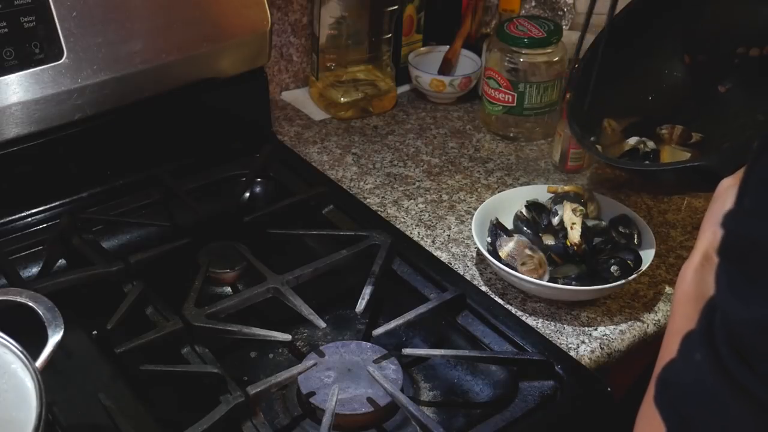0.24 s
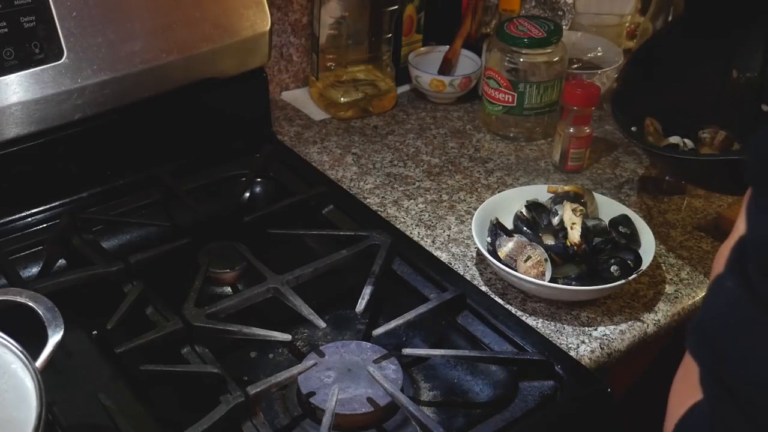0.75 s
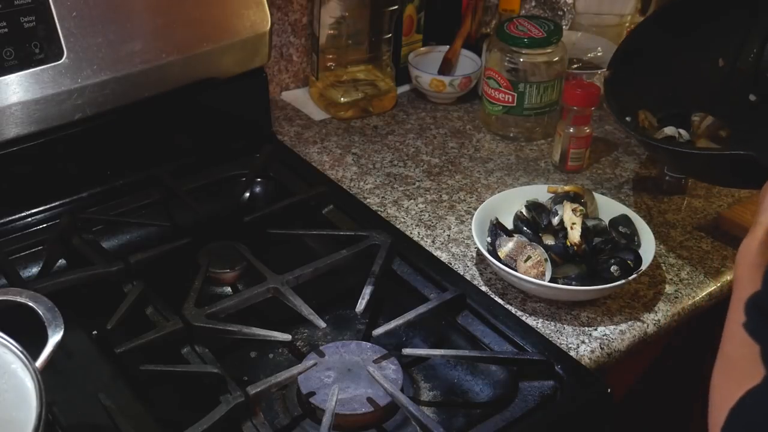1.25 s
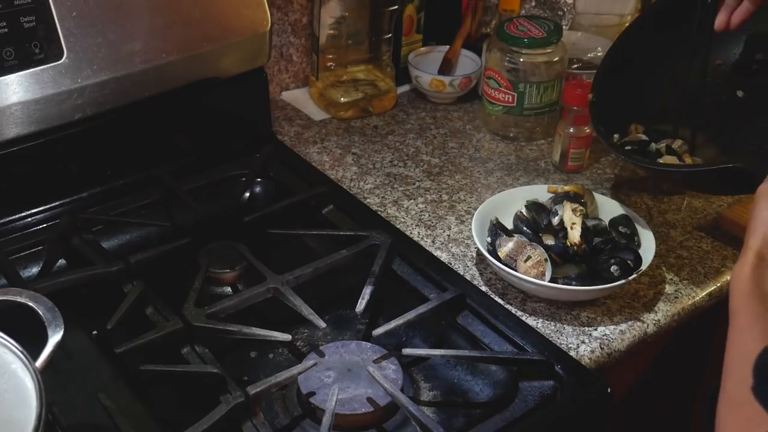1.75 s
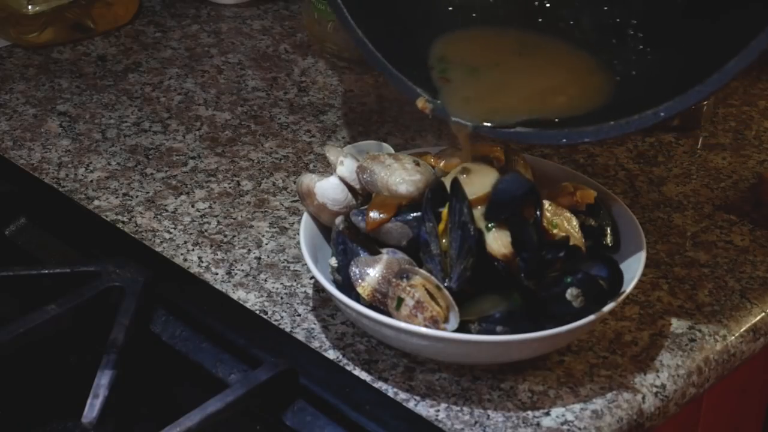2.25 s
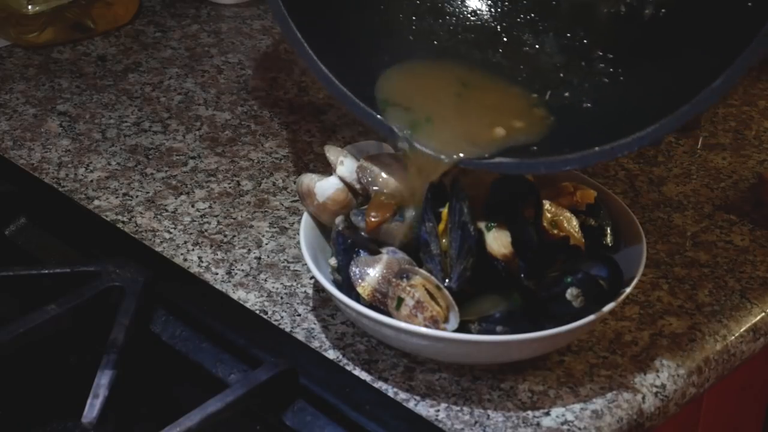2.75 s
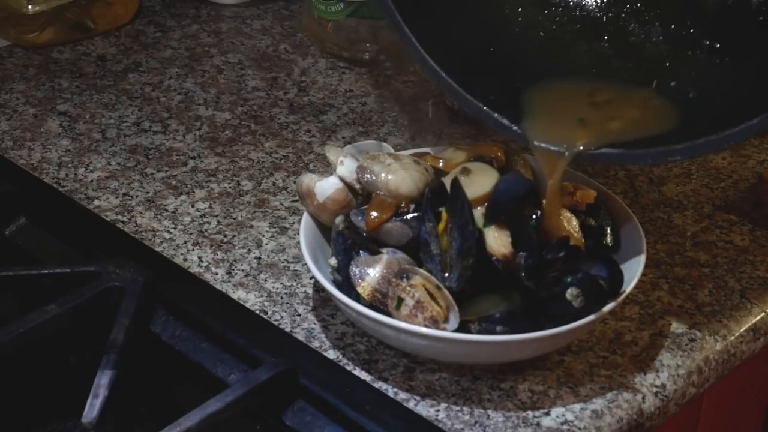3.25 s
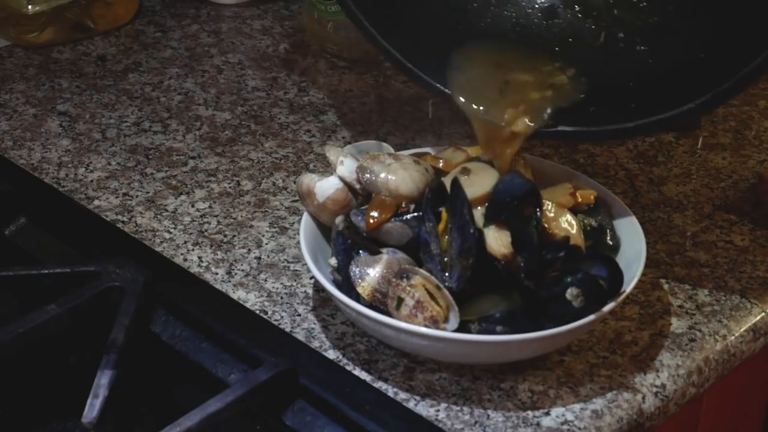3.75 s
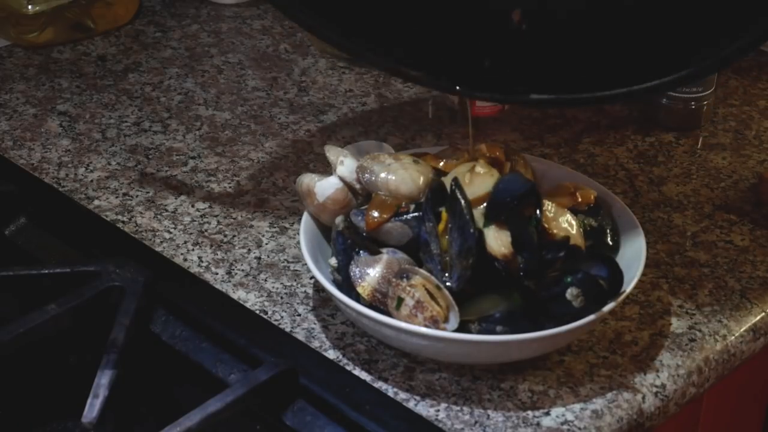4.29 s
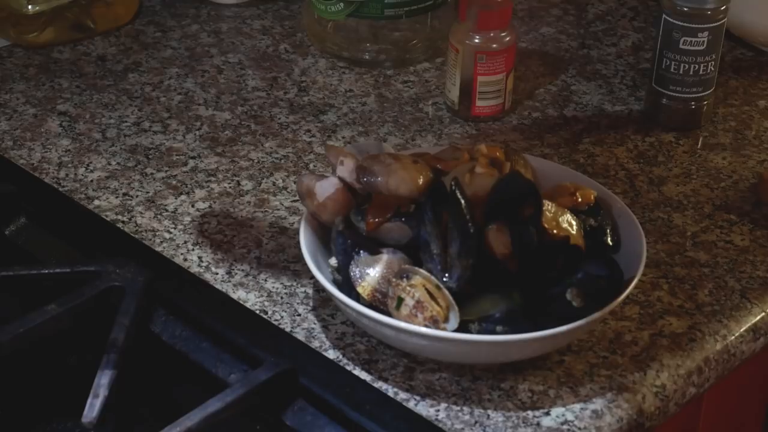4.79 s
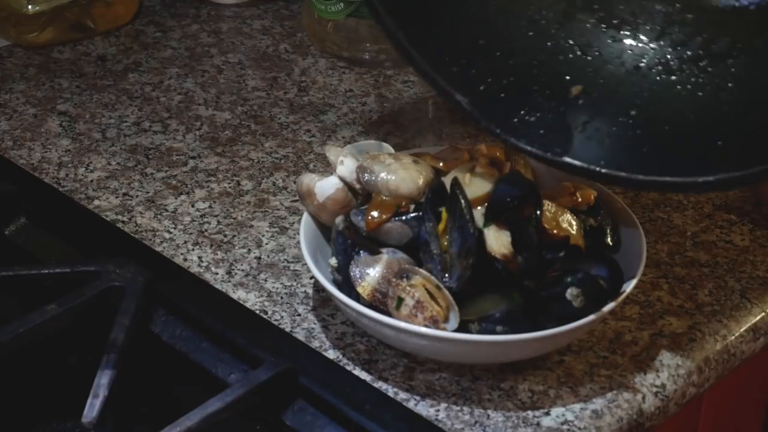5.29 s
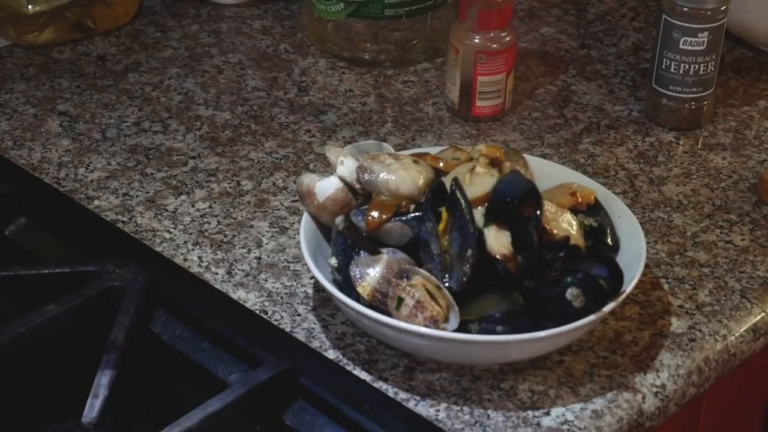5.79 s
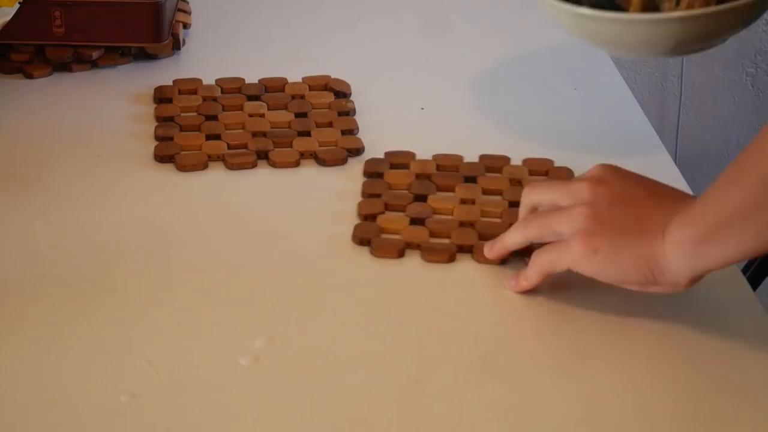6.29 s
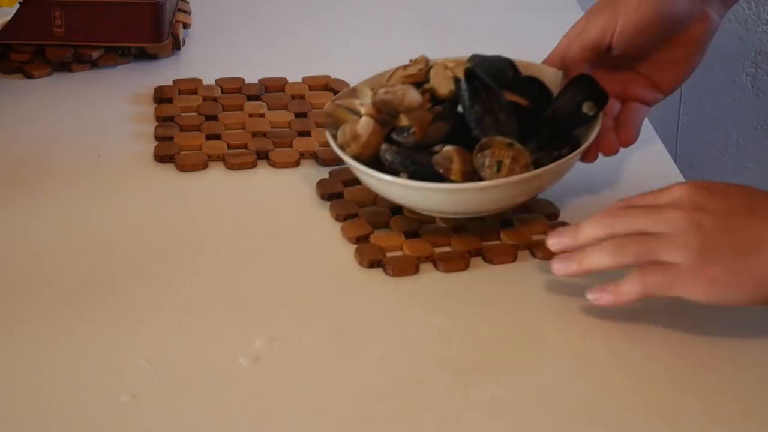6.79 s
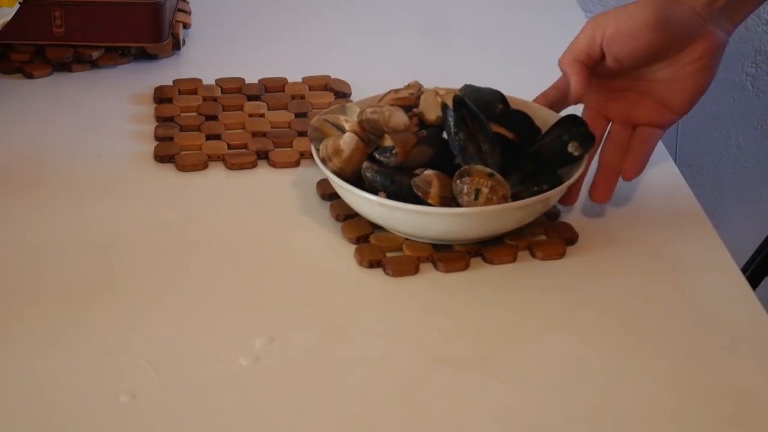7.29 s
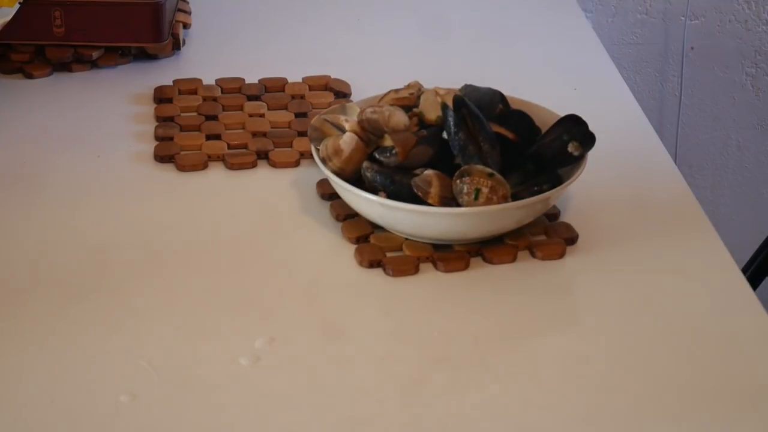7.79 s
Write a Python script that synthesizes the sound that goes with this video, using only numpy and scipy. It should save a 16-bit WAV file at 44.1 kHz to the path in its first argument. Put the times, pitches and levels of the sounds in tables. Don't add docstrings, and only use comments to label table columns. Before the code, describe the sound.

Over a low refrigerator hum, hard shells click and ring china, a wok is tapped and scraped, broth patters, wood rattles, and a full bowl lands.

```python
import sys
import numpy as np
from scipy import signal
from scipy.fft import rfft, irfft, next_fast_len
from scipy.io import wavfile
from scipy.ndimage import uniform_filter1d, map_coordinates

SR = 44100
rng = np.random.default_rng(int(sys.argv[2]) if len(sys.argv) > 2 else 0)


def gain_from_decibels(decibels):
    exponent = np.asarray(decibels, float) / 20
    return 10 ** exponent


def transcribe(u):
    v = np.clip(np.atleast_2d(u).T, -1, 1)
    q = np.round(v * 32767).astype(np.int16)
    wavfile.write(sys.argv[1], SR, q)


N = 354563
TIME = np.arange(N) / SR

# pitch_hz, level_db (per Hz)
AIR = [(100, -32.5), (162, -11), (235, -11), (275, -16), (480, -16.5), (1150, -28.5), (4500, -42),
       (16500, -72)]
DUCT_AIR = [(18, -26.5), (30, -8.5), (55, -5), (85, -5), (125, -7), (170, -43)]
# air_db, hum_120hz_db, hum_60hz_db, hum_240hz_db, fan_46hz_db
STOVE_SIDE = (-51.5, -42, -56.5, -60.5, -78)
TABLE_SIDE = (-50.5, -51, -47.5, -53, -53.5)
# pitch_hz, level_db
MOTOR_WHINE = [(156, -62), (186, -57.5), (360, -63), (515, -66), (1066, -70.5)]
# middle_s, level_db, half_length_s
MOUNT_SWAYS = [
    (5.66, -39.5, 0.073),
    (5.99, -38.5, 0.13),
    (7.2, -52.5, 1),
]
# pitch_hz, level_db (per Hz)
MOUNT_RUMBLE = [(6, -11), (13, -0.5), (20, -9), (36, -10), (48, -40), (100, -79)]
# pitch_hz, t60_s (time to fade by 60 dB)
ROOM_FADE = [(150, 0.43), (1000, 0.55), (4000, 0.41), (7000, 0.31), (10000, 0.27), (15000, 0.053)]
# pitch_hz, level_db (per Hz)
CHANNEL_HISS = [(30, -73), (500, -51), (1000, -52.5), (3000, -54), (7000, -53.5), (12000, -56),
                (15500, -59.5), (16500, -102)]
# middle_s, level_db,
# half_length_s
RUSTLES = [(.005, -39, .018), (.85, -65.5, 0.1), (1.96, -59.5, 0.022), (2.33, -59.5, 0.019),
           (2.66, -59, 0.025), (2.92, -60, 0.064), (3.05, -76, 0.025), (3.39, -60, 0.056),
           (3.7, -58, 0.021), (3.97, -59.5, 0.055), (4.17, -62.5, 0.064), (4.48, -62, 0.032),
           (4.76, -62, 0.032), (5.02, -56.5, 0.023), (5.23, -60.5, 0.03), (5.45, -61, 0.035),
           (5.86, -61, 0.085), (7.5, -59.5, 0.036), (7.59, -49, 0.056), (7.75, -60, 0.074),
           (7.9, -51.5, 0.033)]
# pitch_hz, level_db (per Hz)
CLOTH = [(710, -32), (1200, 1.5), (1560, -17.5), (1640, -14), (1910, -4), (5130, -5), (11700, -21.5),
         (16000, -21)]
# start_s, peak_db, pitch_hz
DROPS = [(2.07, -42, 3400), (2.1357, -43.5, 5550), (2.424, -47.5, 4750), (2.6533, -47, 2260),
         (2.674, -44, 3470), (2.7496, -45.5, 6000), (2.778, -49, 3900), (2.8147, -30.5, 2660),
         (2.8144, -33.5, 3380), (2.83, -40, 2900), (2.892, -44.5, 10300), (2.906, -38, 3200),
         (2.92, -48, 5470), (3.027, -43, 9900), (2.901, -39, 2530), (2.927, -36, 3500),
         (2.975, -38.5, 2280), (3.031, -35, 2620), (3.0984, -42, 2930), (3.156, -34, 4800),
         (3.3203, -48, 3010), (3.5922, -48, 3490), (3.643, -42, 4730), (3.694, -39, 4300),
         (3.697, -45, 10000), (3.7299, -29, 2360), (3.7305, -38, 3700), (3.732, -31.5, 2600),
         (3.733, -39.5, 5800), (3.733, -44, 10000), (3.745, -35.5, 2480), (3.8454, -56, 2800),
         (3.869, -49, 5230), (3.895, -34, 5000), (3.933, -39, 6000), (3.9874, -44, 4180),
         (4.0178, -42, 3170), (4.1116, -44.5, 2040), (4.13, -46, 2000), (4.1634, -45, 1990),
         (4.1789, -41, 4000), (4.267, -41.5, 2260), (4.792, -45.5, 5230), (4.86, -47, 4200)]
# start_s, peak_db, centre_hz
SPATTER = [(2.135, -55, 11000), (2.5703, -42.5, 6000), (2.8135, -34, 4500), (2.88, -40, 11910),
           (2.889, -43, 10000), (2.9044, -42, 11000), (2.9144, -48, 9000), (2.9746, -47, 8900),
           (3.0205, -40, 9330), (3.031, -41, 6100), (3.202, -42, 8500), (3.26, -43, 11000),
           (3.3453, -47, 8000), (3.4047, -45, 11440), (3.557, -46.5, 12400), (3.6932, -36, 6500),
           (3.72, -50, 8000), (3.7304, -34, 3420), (3.8571, -45, 9050), (3.893, -41, 8000),
           (3.933, -44, 7960), (4.049, -42, 11000), (4.0644, -42, 5500), (4.1114, -41, 9000),
           (4.123, -40, 9000), (4.1674, -46, 12000), (4.1912, -36, 4980), (5.849, -36, 9000),
           (5.7894, -52, 4000), (5.8184, -40, 3000)]
# start_s, peak_db, centre_hz, wood_db
TRIVET_KNOCKS = [(5.8481, -33, 1500, -22), (6.2198, -16.5, 3100, -17.5), (6.2259, -5.5, 3140, -12.5),
                 (6.238, -17, 3800, -19), (6.2445, -15, 1990, -21), (6.255, -19.5, 2800, -24),
                 (6.2615, -15.5, 2900, -22), (6.2662, -5.5, 2900, -20.5), (6.274, -18.5, 4350, -22),
                 (6.284, -17.5, 3600, -20), (6.3, -24, 2000, -20), (6.32, -21, 2600, -26),
                 (6.373, -20.5, 2400, -20.5), (6.3752, -15, 1750, -12.5), (6.395, -27.5, 1500, -14.5),
                 (6.6573, -40, 3500, -24), (6.676, -21, 2840, -22), (6.6845, -27, 2750, -13.5),
                 (6.693, -35, 2300, -11), (6.702, -32, 3000, -14)]
# pitch_hz, level_db, t60_s
WOOD_MODES = [(991, 0.5, 0.044), (1295, 0.5, 0.14), (1777, -3.5, 0.049), (1978, 1, 0.066),
              (2786, -4.5, 0.06), (3200, -2.5, 0.035), (3670, -1.5, 0.076), (5510, -1, .03),
              (5970, -10, 0.027)]
# start_s, level_db, pitch_hz, t60_s
BLOCK_NOTES = [(6.226, -14, 4221, .025), (6.2262, -13.5, 5140, 0.027), (6.2275, -15, 1947, .035),
               (6.229, -19.5, 1034, 0.035), (6.243, -18, 2001, 0.034), (6.247, -20, 4330, .03),
               (6.2665, -12.5, 3402, .03), (6.267, -17, 5330, .025), (6.28, -22, 2067, .035),
               (6.288, -25, 4393, .025), (6.321, -26, 3644, .03), (6.321, -26, 1800, .03),
               (6.376, -23, 2842, .025), (6.378, -23, 1007, .035), (6.686, -33, 3590, .03),
               (6.689, -35, 1677, .035), (6.702, -34, 3640, .03), (6.9762, -1.5, 450, .03),
               (6.986, -11.5, 735, 0.027), (6.995, -16.5, 1292, .045)]
# start_s, level_db, hold_s, fade_db_per_s
TRIVET_SLIDES = [
    (6.05, -46.5, 0.19, 100),
    (6.22, -33.5, 0.027, 103),
    (6.29, -31, 0.18, 170),
    (6.67, -35.5, 0.018, 165),
]
# pitch_hz, level_db (per Hz)
SLIDE_GRIT = [(240, -40), (500, -14.5), (994, -6.5), (3300, -8.5), (6000, -19), (9000, -31.5), (13000, -37),
              (16000, -48)]
# start_s, peak_db, centre_hz, table_db
BOWL_KNOCKS = [
    (6.9761, -10, 1940, 3),
    (6.9804, -20.5, 1335, 3.5),
    (7.1265, -31, 4600, -1.5),
    (7.1701, -30, 4300, -1.5),
    (7.186, -23.5, 1640, -3.5),
    (7.1886, -18.5, 1650, 0.5),
    (7.189, -39, 4900, -29),
    (7.203, -32, 1880, -4.5),
]
# pitch_hz, level_db, t60_s
TABLE_MODES = [(150, -7, 0.2), (198, -4, 0.2), (248.6, -3.5, 0.054), (306, -4, 0.17), (360, -3.5, 0.027),
               (375, 2.5, 0.063), (458, 2.5, 0.063), (518.6, -2.6, 0.1), (629.5, -4, 0.15),
               (764, -2.5, 0.07), (872, -5, 0.079), (1042, -10.5, 0.072), (1245, -7.5, 0.094),
               (1324, -6, 0.098)]
# start_s, peak_db, centre_hz, table_db
TABLE_FLEXES = [
    (7.136, -41.5, 1200, 30.5),
    (7.197, -40.5, 1210, 31.5),
    (7.255, -53, 1200, 18),
]
# pitch_hz, level_db, t60_s
TABLE_TOP_MODES = [(143, -7.5, 0.18), (212, -4.5, 0.06), (252, 3.5, 0.13), (317, -5, 0.098),
                   (400, -5, 0.094)]
# start_s, level_db, hold_s, fade_db_per_s
LOAD_JOLTS = [
    (6.967, -25.5, .015, 254),
    (7.178, -29, 0.024, 262),
]
# pitch_hz, level_db (per Hz)
JOLT_GRIT = [(80, -18), (160, -6.5), (400, 0), (1000, -3.5), (2500, -10.5), (5500, -15), (9000, -27),
             (16000, -49.5)]
# start_s, peak_db, centre_hz, steel_db
STICK_KNOCKS = [(1.245, -14, 3343, -0.5), (1.2478, -13.5, 1968, -2.5), (1.2858, -19, 3400, -12),
                (1.2895, -25, 5200, -16), (1.299, -18.5, 3100, -2), (1.3175, -18, 2700, -7),
                (1.3212, -15, 2375, -2), (1.345, -25.5, 3200, -3.5), (1.366, -29.5, 1990, -14),
                (1.408, -40, 4510, -22), (1.5044, -36.5, 5300, -36), (1.586, -39.5, 2760, -30),
                (1.6112, -31, 3500, -26), (1.7629, -41, 2190, -40), (1.7853, -32.5, 2940, -34),
                (1.826, -36.5, 3000, -40)]
# pitch_hz, level_db, t60_s
WOK_MODES = [(443.5, -9, 0.12), (543, -9.5, 0.2), (1030, -4.5, 0.05), (1100, -1.5, 0.28), (1280, 0, 0.081),
             (1882, -6.5, 0.14), (1980, -4.5, .26), (2098, -4.5, 0.085), (2750, -22, 0.75),
             (2930, -6, 0.049), (3315, 1.5, .05), (3500, -9, 0.076)]
# start_s, level_db, pitch_hz, t60_s
WOK_NOTES = [(1.246, -13, 3352, 0.034), (1.251, -18.5, 1125, 0.063), (1.288, -21.5, 2830, .045),
             (1.2985, -20.5, 3187, .03), (1.301, -21, 2799, .035), (1.305, -22, 1981, .055),
             (1.32, -18, 2067, .055), (1.32, -14.5, 2713, .035), (1.321, -22, 5490, 0.034),
             (1.334, -22.5, 3140, .035), (1.34, -24, 2765, .035), (1.361, -29, 5430, .025),
             (1.364, -27, 1985, 0.074)]
# start_s, level_db, hold_s, fade_db_per_s
WOK_SCRAPES = [
    (1.25, -38.5, 0.044, 92.5),
    (1.36, -38, 0.27, 163),
]
# pitch_hz, level_db (per Hz)
WOK_GRIT = [(240, -36), (400, -1.5), (553, -4.5), (645, -20), (1070, -2), (1180, -11.5), (3260, -9),
            (16000, -39.5)]
# start_s, peak_db, centre_hz, china_db
SHELL_KNOCKS = [
    (0.2441, -6.5, 1820, -7),
    (0.2455, -6, 3550, -31.5),
    (0.2742, -11.5, 3400, -8.5),
    (0.2762, -13, 3460, -15.5),
    (0.3278, -10, 3640, -13),
    (0.3342, -18, 5520, -15.5),
    (0.4042, -21, 1900, -15),
]
# pitch_hz, level_db, t60_s
CHINA_MODES = [(862, -8.5, 0.15), (1906, -11.5, 0.16), (1805, -8, 0.045), (2877, -5.5, 0.1),
               (3500, -0.5, 0.05), (4075, -4, 0.26), (5450, -8, .2), (7115, -10, 0.2), (8900, -8.5, 0.11),
               (10870, -17, 0.13), (12000, -26, .15), (13080, -17, .1), (14100, -26, .1), (15410, -27, .13)]
# start_s, peak_db, centre_hz, heap_db
HEAP_KNOCKS = [
    (0.0, -26.5, 2870, -9.5),
    (0.0255, -6, 3790, -15.5),
    (0.0606, -14.5, 3000, -20),
    (0.0623, -4, 2950, -5),
    (0.0652, -8, 4950, -14.5),
    (0.0774, -14.5, 3410, -7.5),
    (0.1455, -4.5, 3920, -14.5),
    (0.1505, -16, 4940, -19),
    (0.1654, -17.5, 1900, -21),
    (0.168, -20, 2257, -21),
]
# pitch_hz, level_db, t60_s
HEAP_MODES = [(2550, -4, .04), (2740, -4.5, 0.045), (3080, -6.5, 0.12), (3295, -5.5, 0.091),
              (3450, -4, 0.053), (4780, -7, 0.03), (4950, -1, 0.036), (5660, -8, .04)]
# start_s, level_db, pitch_hz, t60_s
SHELL_NOTES = [(.0256, -15, 5680, .03), (.0256, -18, 2480, .035), (.027, -25, 1417, .04),
               (.0625, -8, 4780, .035), (.064, -35, 12000, .1), (.064, -37.5, 13500, .1),
               (.064, -38, 15000, .08), (.1457, -12.5, 5150, .025), (.2445, -22, 5510, .04),
               (.2445, -15.5, 7065, .04), (.2445, -20.5, 9040, .04), (.2445, -24, 13260, .04),
               (.251, -19, 4030, .05), (.259, -22.5, 933, .08), (.275, -15.5, 4000, .04),
               (.2755, -19.5, 1890, .04), (.276, -19, 2900, .035), (.277, -17, 5430, .04),
               (.328, -15, 4870, .03), (.328, -19, 2247, .03), (.334, -27, 9130, .04),
               (.335, -18.5, 5510, .045), (.404, -26.5, 3833, .03), (.405, -26, 3120, .03),
               (.406, -23.5, 1852, .045)]

SCENE_CHANGE_S = 1.834
WAVER, LOOSE, STEADY = 0.85, 1.7, 0.45


def unit(x):
    return x / np.sqrt(np.mean(x ** 2) + 1e-20)


def along(points, hz):
    f, v = np.transpose(points)
    return np.interp(np.log(hz + 1), np.log(f + 1), v)


def wobble(rate):
    knots = rng.standard_normal(4096)
    return map_coordinates(knots, [TIME * rate], mode="wrap")


def coloured(x, points):
    m = next_fast_len(N + 8192)
    gain = gain_from_decibels(along(points, np.fft.rfftfreq(m, 1 / SR)))
    return unit(irfft(rfft(x, m) * gain, m)[:N])


def swells(rows):
    return sum(gain_from_decibels(db) * np.exp(-0.5 * ((TIME - s) / half) ** 2) for s, db, half in rows)


def add(track, s, sound):
    part = track[round(s * SR):][:len(sound)]
    part += sound[:len(part)]


def burst(t, lo_hz, hi_hz, t60):
    band = signal.butter(3, [lo_hz, hi_hz], "bandpass", fs=SR, output="sos")
    return 0.5 * unit(signal.sosfilt(band, rng.standard_normal(len(t)))) * gain_from_decibels(-60 * t / t60)


def ring(modes, t, scatter_db, waver=WAVER):
    hz, db, t60 = np.transpose(modes)[:, :, None]
    sign = (-1) ** np.arange(len(modes))[:, None]
    steps = np.cumsum(rng.standard_normal((len(modes), len(t) // 64 + 1)), axis=1)
    drift = uniform_filter1d(np.repeat(steps - steps[:, :1], 64, axis=1), 64)[:, :len(t)]
    drift = drift * np.sqrt(64 / SR / 0.01)
    strength = gain_from_decibels(db + rng.normal(0, scatter_db, db.shape) - 60 * t / t60)
    return np.sum(sign * strength * np.sin(2 * np.pi * hz * t + waver * drift), axis=0)


def notes(rows, soft, waver):
    out, t = np.zeros(N), np.arange(SR // 6) / SR
    for s, db, hz, t60 in rows:
        rise = 1 - np.exp(-t / soft)
        add(out, s, rise * ring([(hz, db, t60)], t, scatter_db=0, waver=waver))
    return out


def knocks(events, body, reach, soft, tone_db, thud_db, crack_db, life, hard, push_db, snap_db,
           waver=WAVER, firm=0.49, under=0.52):
    out, t, long = np.zeros(N), np.arange(SR // 10) / SR, np.arange(SR // 3) / SR
    for s, db, hz, body_db in events:
        pitches = hz * np.exp(np.linspace(-under, reach, num=14) + rng.normal(0, 0.043, size=14))
        modes = [(hz, tone_db, life * 0.6)]
        modes += [(p, -8 - 7 * abs(np.log(p / hz)), life * 0.5) for p in pitches]
        piece = ring(modes, t, scatter_db=4.5)
        rattle = 0.61 * burst(t, hz * np.exp(-under), min(hz * np.exp(reach), 15000), life)
        brightness_db = 2.5 * np.log2(hz / 3000)
        crack = gain_from_decibels(crack_db + hard * db + brightness_db) * burst(t, 5500, 15500, life * 0.56)
        thud = gain_from_decibels(thud_db + firm * body_db) * burst(t, 530, 1860, life * 1.88)
        air_push = gain_from_decibels(push_db + firm * body_db) * (1 - t / 0.00057) * np.exp(-t / 0.00057)
        rise = 1 - np.exp(-long / soft)
        add(out, s, gain_from_decibels(db + 1.0) * rise[:len(t)] * (0.35 * piece + rattle + crack + thud + air_push))
        add(out, s, gain_from_decibels(1.3 * db + snap_db) * burst(t, 1500, 11000, 0.0045))
        add(out, s, gain_from_decibels(db + body_db - 8.5) * rise * ring(body, long, scatter_db=1.5, waver=waver))
    return out


def friction(strokes, spectrum, body, ring_db, grain_db, waver=WAVER):
    level = np.zeros(N)
    for s, db, hold, fade in strokes:
        rise_db = np.minimum(2000 * (TIME - s - 0.01), 0)
        level += gain_from_decibels(db + np.minimum(rise_db, fade * (s + hold - TIME)))
    grit = rng.standard_normal(N) * gain_from_decibels(grain_db * wobble(300) + 1.54 * wobble(40))
    sung = signal.fftconvolve(grit, ring(body, TIME[:SR // 2], scatter_db=1.5, waver=waver))[:N]
    rubbing = coloured(grit, spectrum) + gain_from_decibels(ring_db) * unit(sung)
    return gain_from_decibels(-7.0) * level * (level > 1e-4) * rubbing


def room(x):
    out, step = np.zeros(N), SR // 6
    for start in range(0, N, step):
        noise, part = rng.standard_normal(SR * 2 // 5), x[start:start + step]
        if part.any():
            hz, t, z = signal.stft(noise, SR, nperseg=256)
            fading = z * gain_from_decibels(-60 * t / along(ROOM_FADE, hz)[:, None])
            tail = signal.istft(fading, SR, nperseg=256)[1]
            add(out, start / SR + 0.004, signal.fftconvolve(part, tail / np.linalg.norm(tail)))
    return out


def tone(hz):
    return np.sqrt(2) * np.sin(2 * np.pi * hz * TIME + 0.14 * wobble(4.3))


def kitchen():
    moved = np.clip((TIME - 6.22) / 0.013 + 0.5, 0, 1)
    levels = [a + (b - a) * moved for a, b in zip(STOVE_SIDE, TABLE_SIDE)]
    air_db, second_db, first_db, fourth_db, fan_db = levels
    first_db = first_db + moved * 5 * np.cos(2 * np.pi * (TIME - 6.78) / 1.57)
    hum = gain_from_decibels(second_db + 0.26 * wobble(5.4)) * tone(120)
    hum = hum + gain_from_decibels(first_db + 0.51 * wobble(3.8)) * tone(60)
    hum = hum + gain_from_decibels(fourth_db + 1.4 * wobble(11)) * tone(240)
    hum = hum + gain_from_decibels(fan_db + 1.5 * wobble(5.3)) * tone(46.5)
    hum = hum + sum(gain_from_decibels(db + 2.6 * wobble(8)) * tone(hz) for hz, db in MOTOR_WHINE)
    air = coloured(rng.standard_normal(N), AIR)
    air = air + gain_from_decibels(-7.5) * coloured(rng.standard_normal(N), DUCT_AIR)
    air = gain_from_decibels(air_db + 2.5 + 0.29 * wobble(2.3)) * air
    recovery = gain_from_decibels(-1 * np.exp(-TIME / 0.2))
    return recovery * (hum + air) + swells(MOUNT_SWAYS) * coloured(rng.standard_normal(N), MOUNT_RUMBLE)


def rustle():
    return swells(RUSTLES) * coloured(rng.standard_normal(N) * gain_from_decibels(1.06 * wobble(150)), CLOTH)


def broth():
    out, t = np.zeros(N), np.arange(SR // 12) / SR
    for s, db, hz in DROPS:
        life = hz * t / 11
        bubble = np.sin(2 * np.pi * hz * t * (0.95 + 0.054 * life)) * np.exp(-1.95 * life)
        soft_start = 1 - np.exp(-hz * t / 1.3)
        splash = gain_from_decibels(-6) * burst(t, hz * 0.7, min(hz * 1.4, 16000), 0.03)
        add(out, s, gain_from_decibels(db + 2.3) * (bubble * soft_start + splash))
    for s, db, hz in SPATTER:
        add(out, s, gain_from_decibels(db - 3.5) * burst(t, hz * 0.41, min(hz * 1.3, 16000), 0.022))
    return out


def trivet_slide():
    return friction(TRIVET_SLIDES, SLIDE_GRIT, WOOD_MODES, ring_db=-12.5, grain_db=2.0)


def trivet_rattle():
    return knocks(TRIVET_KNOCKS, WOOD_MODES, reach=0.778, soft=0.00078, tone_db=-3.5, thud_db=-9.5,
                  crack_db=-15.0, life=0.03, hard=0.8, push_db=-2, snap_db=-3.5, waver=LOOSE)


def bowl_landing():
    landing = knocks(BOWL_KNOCKS, TABLE_MODES, reach=0.62, soft=0.00014, tone_db=-6.0, thud_db=0.5,
                     crack_db=4.5, life=0.029, hard=1.6, push_db=8, snap_db=-2.5)
    flexing = knocks(TABLE_FLEXES, TABLE_TOP_MODES, reach=0.98, soft=0.0043, tone_db=-9, thud_db=-18.5,
                     crack_db=-30, life=0.041, hard=0.1, push_db=-30, snap_db=-30)
    return landing + flexing + friction(LOAD_JOLTS, JOLT_GRIT, TABLE_MODES, ring_db=-9.5, grain_db=2.8)


def wok_scrape():
    return friction(WOK_SCRAPES, WOK_GRIT, WOK_MODES, ring_db=-2.5, grain_db=1.0, waver=STEADY)


def wok_knocks():
    taps = knocks(STICK_KNOCKS, WOK_MODES, reach=0.77, soft=0.00045, tone_db=-1.5, thud_db=-15.0,
                  crack_db=-22.5, life=0.047, hard=0.041, under=0.3, push_db=-21, firm=0.044,
                  snap_db=-9, waver=STEADY)
    return taps + notes(WOK_NOTES, soft=0.0012, waver=STEADY)


def falling_shells():
    on_china = knocks(SHELL_KNOCKS, CHINA_MODES, reach=0.51, soft=0.00022, tone_db=2.0, thud_db=-4.5,
                      crack_db=-14.0, life=0.031, hard=0.59, under=0.36, push_db=-4.5, snap_db=-6.5)
    on_heap = knocks(HEAP_KNOCKS, HEAP_MODES, reach=0.45, soft=0.0002, tone_db=-5.5, thud_db=-20.5,
                     crack_db=-17.0, life=0.026, hard=0.4, under=0.35, push_db=-21.5, snap_db=0.5,
                     waver=LOOSE)
    return on_china + on_heap


def scene():
    drops, slide, trivet, bowl = broth(), trivet_slide(), trivet_rattle(), bowl_landing()
    blocks = notes(BLOCK_NOTES, soft=0.0004, waver=LOOSE)
    scrape, wok, shells = wok_scrape(), wok_knocks(), falling_shells()
    chimes = notes(SHELL_NOTES, soft=0.0004, waver=WAVER)
    to_room = gain_from_decibels(-15) * chimes + gain_from_decibels(-7.5) * shells + gain_from_decibels(-9.5) * wok + gain_from_decibels(-9) * scrape
    before = shells + chimes + wok + scrape + room(to_room)
    to_room = gain_from_decibels(-13) * blocks + gain_from_decibels(-7.5) * trivet + gain_from_decibels(-8.5) * bowl
    to_room = to_room + gain_from_decibels(-11.0) * drops + gain_from_decibels(-12.0) * slide
    after = trivet + blocks + bowl + slide + drops + room(to_room)
    mono = (TIME < SCENE_CHANGE_S) * before + after + rustle() + kitchen()
    return np.array([mono, mono])


def band_limit(x):
    return signal.sosfilt(signal.butter(12, 16630, fs=SR, output="sos"), x)


def record(dry):
    flutter_colour = [(30, 4), (300, 2), (1000, 2.0), (3000, 8.5), (9000, 16.5), (16000, 18)]  # (Hz, dB)
    flutter = gain_from_decibels(-29) * coloured(dry[0] * wobble(200), flutter_colour) * np.std(dry[0])
    side = flutter + gain_from_decibels(-73.5) * coloured(rng.standard_normal(N), CHANNEL_HISS)
    x = dry + [side, -side]
    flattened = x / (1 + np.abs(x) ** 8) ** (1 / 8)
    band = signal.butter(N=10, Wn=15450, fs=SR, output="sos")
    return band_limit(signal.sosfiltfilt(band, flattened))


dry = scene()
out = record(dry)
transcribe(out)
```